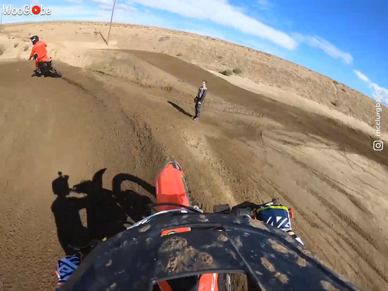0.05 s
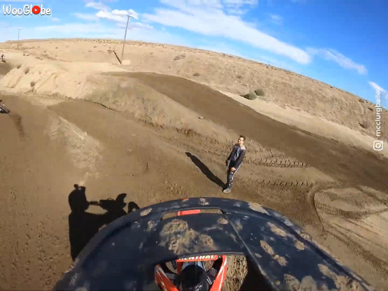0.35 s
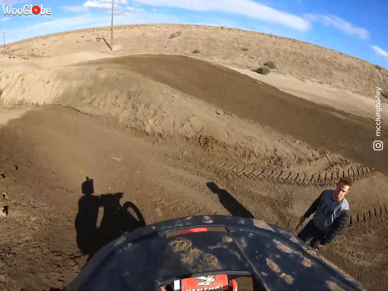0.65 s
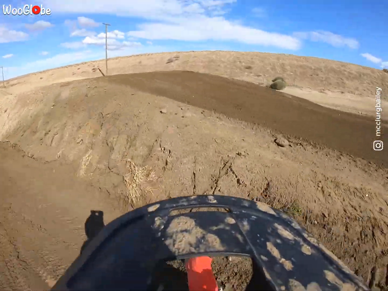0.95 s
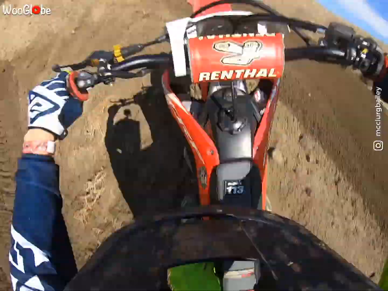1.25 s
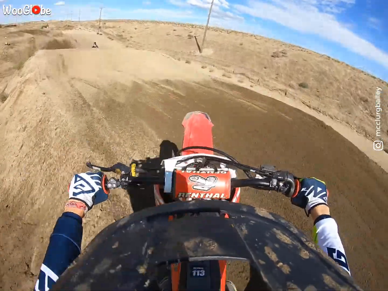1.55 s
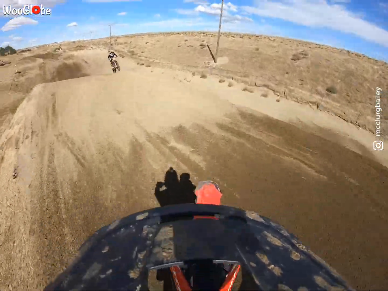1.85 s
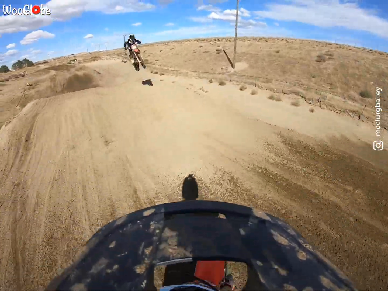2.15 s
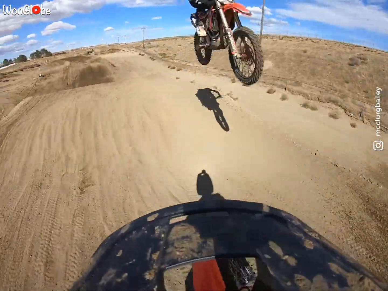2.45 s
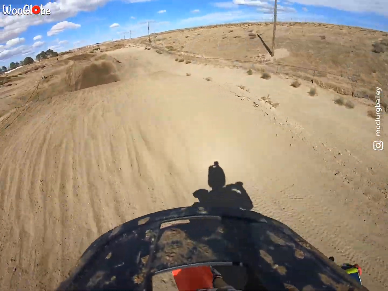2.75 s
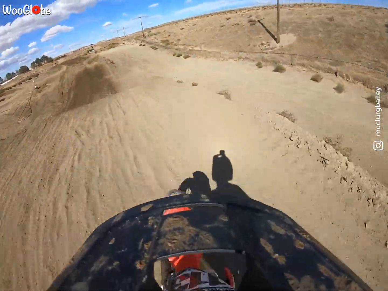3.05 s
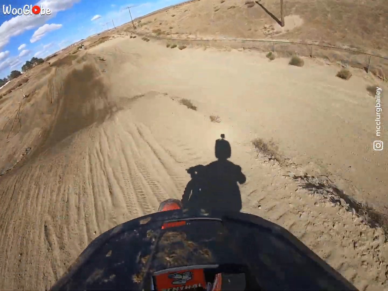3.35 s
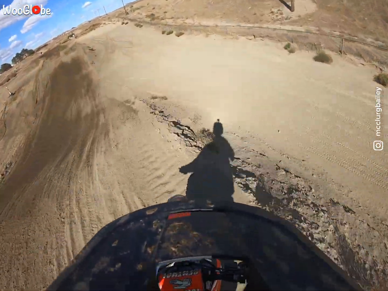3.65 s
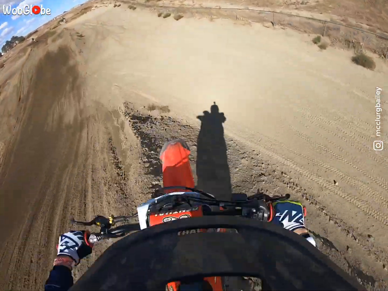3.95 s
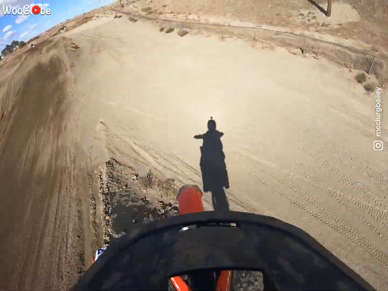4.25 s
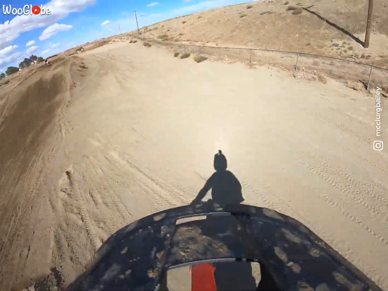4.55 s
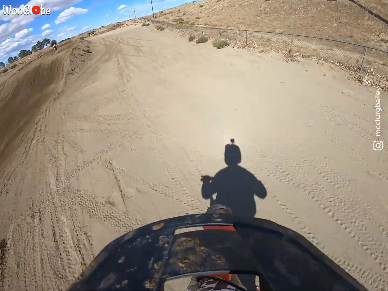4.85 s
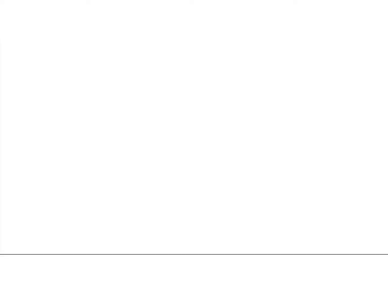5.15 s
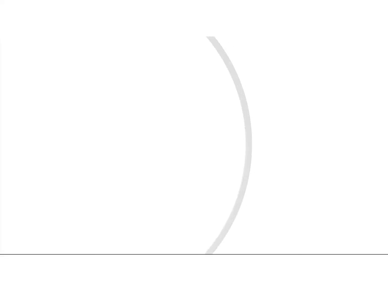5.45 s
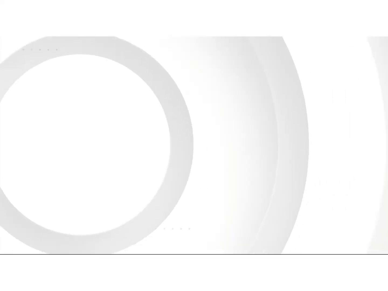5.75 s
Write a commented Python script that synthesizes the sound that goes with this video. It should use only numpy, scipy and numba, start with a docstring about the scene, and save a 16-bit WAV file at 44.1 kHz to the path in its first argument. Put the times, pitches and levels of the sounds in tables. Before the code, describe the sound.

A dirt bike booms and chugs in buffeting wind, heard from the rider's helmet, while another bike barks past.

```python
"""A four-stroke dirt bike booms under the throttle in buffeting wind, heard at the rider's helmet.
Its pulses resonate in the airbox, rasp in the pipe under load and chug with the throttle shut.
Another bike's exhaust barks past and falls away. Eddies off the helmet rumble and hiss,
the chassis knocks over bumps, and the sound stops abruptly."""
import sys
import numpy as np
from scipy import signal
from scipy.fft import rfft, irfft
from scipy.io import wavfile
from scipy.ndimage import uniform_filter1d
from numba import njit

SR = 44100
rng = np.random.default_rng(int(sys.argv[2]) if len(sys.argv) > 2 else 0)


def wav_record(signal):
    """Record a signal, one row per channel, as 16-bit PCM in the file named by sys.argv[1]."""
    frames = np.transpose(np.atleast_2d(signal))
    bounded = np.clip(frames, -1, 1)
    # unit amplitude maps onto the largest positive 16-bit level
    quanta = np.round(bounded * 32767).astype(np.int16)
    wavfile.write(sys.argv[1], SR, quanta)


N = 255095
T = np.arange(N) / SR


def undb(db):
    """Decibels to gain."""
    return 10 ** (np.asarray(db) / 20)


def curves(table):
    """Each column after the first, interpolated linearly in time."""
    time_s, *columns = np.transpose(table)
    return [np.interp(T, time_s, column) for column in columns]


def unit(x):
    """Scale to rms 1."""
    return x / np.sqrt(np.mean(x ** 2))


def steady(x, span_s=0.04):
    """Hold the short-term rms at 1, leaving single pulses intact."""
    size = int(span_s * SR)
    power = uniform_filter1d(uniform_filter1d(x ** 2, size), size)
    return x / np.sqrt(np.abs(power) + 1e-12)


def colour(x, spectrum):
    """Filter by (freq_hz, gain_db) points; rms 1."""
    hz, db = np.transpose(spectrum)
    bins_hz = np.maximum(np.fft.rfftfreq(N, 1 / SR), 1)
    gain = undb(np.interp(np.log(bins_hz), np.log(hz), db))
    return unit(irfft(rfft(x) * gain, N))


def noise():
    """White noise."""
    return rng.standard_normal(N)


def wander(rate_hz):
    """Straight glides between random values; rms 1."""
    step = int(SR / rate_hz)
    held = np.repeat(noise()[:N // step + 1], step)
    return unit(uniform_filter1d(held, step)[:N])


@njit
def bandpass(x, hz, width_hz):
    """State-variable band-pass with a moving centre."""
    out, band_state, low_state = np.empty(len(x)), 0., 0.
    for i in range(len(x)):
        g = np.tan(np.pi * hz[i] / SR)
        damping = width_hz[i] / hz[i]
        band = (band_state + g * (x[i] + 1e-18 - low_state)) / (1 + g * (g + damping))
        band_state = 2 * band - band_state
        low_state += 2 * g * band
        out[i] = damping * band
    return out


def ring(x, hz, width_hz, stages=1):
    """Identical resonances in series."""
    for _ in range(stages):
        x = bandpass(x, hz * np.ones(N), width_hz * np.ones(N))
    return x


def lowpass(x, hz, order):
    """Butterworth low-pass."""
    return signal.sosfilt(signal.butter(order, hz, fs=SR, output="sos"), x)


def firings(cycles, scatter_db):
    """One pulse of random strength per whole cycle."""
    count = np.floor(cycles)
    return np.diff(count, prepend=count[0]) * undb(scatter_db * noise())


def puffs(pulses, decay_s):
    """Turbulent gas: decaying noise after each pulse."""
    tails = signal.lfilter([1], [1, -np.exp(-1 / (decay_s * SR))], pulses + 1e-18)
    return tails * noise()


def swell(start_s, end_s, attack_s, release_s):
    """Rise towards 1, hold, die away."""
    rise = 1 - np.exp(-np.maximum(T - start_s, 0) / attack_s)
    return rise * np.exp(-np.maximum(T - end_s, 0) / release_s)


# peak_s, rise_s, fall_s, rumble_db, rush_db, hiss_db
NOISE_SWELLS = [(0.02, 0.085, 1, -21.5, -29, -39), (.32, 0.063, 0.12, -27, -21, -32.5),
                (.41, 0.12, 0.15, -34.5, -20, -31.5), (.66, 0.23, 0.7, -35.5, -26.5, -36.5),
                (1.111, 0.13, 0.15, -20.5, -22.5, -49), (1.21, 0.051, 0.1, -30, -19.5, -37),
                (1.34, 0.12, 0.17, -39, -31.5, -36), (1.851, 0.27, 0.28, -34.5, -35, -42),
                (2.061, 0.072, 0.048, -20.5, -23, -40.5), (2.256, 0.065, 0.075, -21.5, -27.5, -44),
                (2.35, 0.043, 0.13, -19, -43, -40.5), (2.57, 0.11, 0.16, -21, -22.5, -30),
                (2.69, .05, 0.066, -19, -26.5, -30.5), (3.078, 0.057, 0.08, -25, -25, -57),
                (3.341, 0.056, 0.098, -20, -24, -64), (3.46, 0.04, 0.063, -28, -26.5, -38.5),
                (3.615, 0.08, 0.13, -25, -20.5, -32.5), (3.75, 0.05, .05, -20.5, -25, -34),
                (3.89, 0.077, 0.1, -24.5, -22, -32.5), (4.101, 0.076, 0.2, -28.5, -31, -41),
                (4.281, 0.095, 0.033, -27, -29, -37.5), (4.48, 0.081, 0.15, -26, -24, -30.5),
                (4.591, 0.11, 0.2, -27, -23.5, -35), (4.68, 0.021, 0.069, -21.5, -39, -35.5),
                (4.83, 0.077, 0.058, -20.5, -27, -51), (4.951, 0.14, 0.19, -22, -21, -35.5),
                (5.16, 0.044, 0.076, -22, -24.5, -33)]


def noise_swells(calm_db):
    """Swells of rumble, rush and hiss: wind gusts, the other bike rushing past, an engine blip."""
    power = undb(calm_db)[:, None] ** 2
    for peak_s, rise_s, fall_s, *peaks_db in NOISE_SWELLS:
        distance = np.maximum((peak_s - T) / rise_s, (T - peak_s) / fall_s)
        crest = np.exp(-distance ** 1.1)  # exponent 1 is pointed, 2 a bell
        power = power + np.outer(undb(peaks_db), crest) ** 2
    return np.sqrt(power)


# Air spectra, low to high: freq_hz, gain_db
RUMBLE_SPECTRUM = [(15, -23), (35, -6.5), (62, 0), (80, -2.5), (115, -.5), (150, -3.5), (200, -11),
                   (300, -16), (900, -38), (4000, -110)]
RUSH_SPECTRUM = [(120, 1), (250, 6.5), (450, -1), (800, -6), (1300, -9.5), (1800, -18), (2600, -26.5),
                 (4500, -45.5), (6000, -73)]
HISS_SPECTRUM = [(800, 0), (1600, 9.5), (2400, 5.5), (3300, 2.5), (4400, -3.5), (4900, -12), (5500, -27.5),
                 (7000, -51)]
SIZZLE_SPECTRUM = [(4000, -12), (5700, -8.5), (7000, -5), (8300, -8.5), (10000, -17.5), (11500, -27),
                   (14000, -58.5)]
# Top treble relative to the hiss: time_s, gain_db
SIZZLE_GAIN = [(0, -22.5), (.4, -27.5), (.8, -22.5), (2.7, -24.5), (3.2, -23.5), (3.6, -34.5), (4.15, -29),
               (4.5, -36), (5.18, -30)]


def rushing_air():
    """Mostly eddies shed by the helmet: a low rumble, and upper bands that flutter together."""
    rumble_gain, rush_gain, hiss_gain = noise_swells(calm_db=(-29.5, -30.5, -49.5))
    sizzle_db, = curves(SIZZLE_GAIN)
    eddies = unit(undb(1.77 * np.tanh(wander(70)) + 1.1 * wander(420)))
    rumble = rumble_gain * colour(noise(), RUMBLE_SPECTRUM)
    rush = rush_gain * colour(eddies * noise(), RUSH_SPECTRUM)
    hiss = hiss_gain * colour(eddies * noise(), HISS_SPECTRUM)
    sizzle = hiss_gain * undb(sizzle_db) * colour(eddies * noise(), SIZZLE_SPECTRUM)
    return rumble + rush + hiss + sizzle


# start_s, level_db, centre_hz, decay_s
KNOCKS_AND_TICKS = [(0.935, -33, 1040, 0.022), (1.293, -35.5, 7500, 0.0013), (1.367, -43, 7565, 0.0046),
                    (1.368, -28, 3080, 0.0039), (3.535, -21, 950, 0.012), (3.536, -14.5, 230, .02),
                    (3.957, -22, 330, .02), (4.126, -30, 430, .008), (4.411, -14.5, 180, .014),
                    (4.771, -21.5, 520, .009), (4.801, -53, 6500, 0.0018), (4.823, -45, 6900, 0.0013),
                    (4.843, -53, 6200, 0.0017), (4.863, -49, 5700, 0.0022), (4.879, -50, 6240, .0015)]


def knocks_and_ticks():
    """Damped noise bursts: knocks over bumps, and a short run of faint exhaust ticks from another bike."""
    out = np.zeros(N)
    for start_s, level_db, centre_hz, decay_s in KNOCKS_AND_TICKS:
        envelope = (T >= start_s) * np.exp(-np.maximum(T - start_s, 0) / decay_s)
        width_hz = 0.39 * centre_hz
        makeup = np.sqrt(2 * SR / (np.pi * width_hz))  # offsets the band-pass loss
        out += undb(level_db) * makeup * ring(envelope * noise(), centre_hz, width_hz, stages=2)
    return out


# Stretches of firing, each with its own rate and tone: start_s, end_s, start_rate_hz, end_rate_hz,
# thump_db, silencer_db, bark_db, bark_hz, crack_db, snap_db
OTHER_BIKE_STRETCHES = [(0.404, 0.477, 41.2, 36.9, -41.5, -54, -47.5, 1965, -49.5, -64),
                        (0.5085, 0.605, 41.2, 42, -27.5, -49.5, -39, 2160, -45.5, -60),
                        (.63, 0.721, 43.9, 44.6, -40, -58, -47.5, 2330, -50.5, -65),
                        (0.816, 1.072, 42.57, 47.8, -30, -63, -48, 2094, -56, -71),
                        (1.386, 1.502, 52.6, 48.54, -25, -68, -56, 2553, -51, -79),
                        (1.526, 1.604, 50.5, 53.33, -34, -40, -41, 2373, -49.5, -62),
                        (1.619, 1.668, 56.9, 54.2, -32, -46.5, -52, 2135, -58, -83),
                        (1.679, 1.768, 47.4, 61.26, -22.5, -38.5, -41, 1865, -51, -69),
                        (1.784, 1.843, 68.54, 69.4, -32, -36.5, -46.5, 1740, -57, -72),
                        (1.859, 1.91, 58.8, 60.7, -36, -36.5, -51, 1710, -69, -77.5),
                        (1.924, 1.998, 72.9, 76.2, -35, -48.5, -38, 1400, -57, -78),
                        (2.037, 2.073, 55.35, 55.2, -43, -45, -49, 1744, -59, -90),
                        (2.09, 2.124, 56.7, 54.4, -39, -39.5, -53, 1733, -61, -75),
                        (2.146, 2.188, 56.44, 56.1, -33, -52, -56, 1695, -62, -79),
                        (2.24, 2.279, 48.94, 58.6, -29, -47, -54, 1702, -54, -71),
                        (2.297, 2.346, 59.63, 59.05, -50, -38, -44, 1850, -55, -73),
                        (2.365, 2.421, 58.5, 55.6, -54, -36.5, -39, 2300, -39, -60),
                        (2.433, 2.494, 57.47, 56.6, -36, -41, -47, 1912, -46.5, -76),
                        (2.505, 2.615, 57.5, 69.25, -32.5, -36, -39, 1605, -44, -71),
                        (2.627, 2.713, 69.7, 72.5, -22.5, -47.5, -52, 1428, -46.5, -75),
                        (2.719, 2.842, 66.24, 69.04, -28, -66.5, -65, 1537, -52.5, -80),
                        (2.867, 2.985, 61.4, 64.15, -24, -43.5, -60.5, 3890, -55.5, -74),
                        (3.011, 3.157, 61.9, 59, -26.5, -46.5, -68.5, 3920, -61, -86.5)]
# Exhaust crack, with the camera's dip near 5.8 kHz: freq_hz, gain_db
CRACK_SPECTRUM = [(700, -8), (1500, -3), (2300, 0), (3200, -3), (4500, -4), (5100, -10), (5800, -30),
                  (7500, -26), (10000, -43), (14000, -78)]
# freq_hz, gain_db
SNAP_SPECTRUM = [(3000, -23), (5400, 5.5), (7500, 4), (9000, -3), (11000, -12.5), (14000, -45.5)]


def other_bike():
    """Each firing thumps, rings the silencer and lets out a crack of gas with a snap on top."""
    pulses = np.zeros(N)
    midpoints = []
    for start_s, end_s, start_rate_hz, end_rate_hz, *timbre in OTHER_BIKE_STRETCHES:
        rate_hz = np.interp(T, [start_s, end_s], [start_rate_hz, end_rate_hz])
        cycles = (T - start_s) * (start_rate_hz + rate_hz) / 2
        active = (T > start_s - .005) * (T < end_s + .005)
        pulses += active * firings(cycles, scatter_db=1.4)
        midpoints.append(((start_s + end_s) / 2, *timbre))
    thump_db, silencer_db, bark_db, bark_hz, crack_db, snap_db = curves(midpoints)
    thump = ring(ring(pulses, 310, width_hz=48), 200, width_hz=50)
    thump += 0.07 * ring(ring(pulses, 90, width_hz=24), 60, width_hz=140)
    blast = pulses + .1 * puffs(pulses, decay_s=.004)
    blast = lowpass(blast, hz=4200, order=6)  # silencer packing absorbs the top
    silencer_hz = 1575 * (1 + .03 * wander(60))
    silencer = ring(blast, silencer_hz, width_hz=420, stages=2)
    bark = ring(blast, bark_hz, width_hz=.22 * bark_hz, stages=2)
    crack = colour(pulses + .5 * puffs(pulses, decay_s=.002), CRACK_SPECTRUM)
    snap = colour(puffs(pulses, decay_s=.0009), SNAP_SPECTRUM)
    return (undb(thump_db) * unit(thump) + undb(silencer_db) * unit(silencer)
            + undb(bark_db) * unit(bark) + undb(crack_db) * crack + undb(snap_db) * snap)


def helmet(x):
    """The helmet passes mostly the low boom."""
    return lowpass(x, hz=470, order=8)


# freq_hz, gain_db
RASP_SPECTRUM = [(300, -29.5), (480, -6.5), (750, -1.5), (1300, -4), (1700, -16.5), (3000, -23),
                 (5000, -46), (8000, -77.5)]


def pipe_rasp(exhaust):
    """Each exhaust pulse rattles down the pipe as a short noise tail."""
    pipe_response = noise() * np.exp(-T / .007)
    rattle = signal.fftconvolve(exhaust, pipe_response)[:N]
    return steady(colour(rattle, RASP_SPECTRUM))


def tailpipe_thud(exhaust, firing_hz):
    """The tailpipe thuds harder when the firing rate meets its resonance."""
    pipe_hz, spread_hz = 60.5, 5.1
    level_db = -40.5 + 11.5 * np.exp(-((firing_hz - pipe_hz) / spread_hz) ** 2)
    thud = ring(ring(exhaust, 62, width_hz=45), 66, width_hz=60)
    return undb(level_db) * steady(thud)


# start_s, end_s, then level_db of each harmonic ahead of the helmet
DRONES = [(-.05, .12, -28.5, -29.5, -47.5, -51.5), (0.547, 0.652, -27, -34.5, -27, -22.5),
          (0.664, 0.762, -22, -20, -20, -44), (0.772, 0.87, -22, -32.5, -25.5, -42),
          (0.908, 0.98, -25, -40, -27.5, -40.5), (1.205, 1.312, -28.5, -33, -33, -52.5),
          (2.634, 2.786, -26, -18, -25, -40.5), (2.77, 2.922, -28.5, -16, -41.5, -37.5),
          (2.9, 3.063, -28, -21, -38, -41)]


def airbox_drone(cycles):
    """Under load the airbox drones on even harmonics of the firing rate."""
    pull = np.array([swell(start_s, end_s, attack_s=0.016, release_s=0.019)
                     for start_s, end_s, *_ in DRONES])
    gains = undb(np.array(DRONES)[:, 2:]).T @ pull
    tones = np.cos(2 * np.pi * np.outer((4, 6, 8, 10), cycles))
    return np.sqrt(2) * np.sum(gains * tones, axis=0)


def airbox_honk(pulses, firing_hz, opening):
    """A higher resonance that climbs with the revs and grows as the throttle opens."""
    centre_hz = np.maximum(278, 4.8 * firing_hz)
    return (0.2 + opening) * steady(ring(pulses, centre_hz, width_hz=68))


# Boom before throttle gain: time_s, level_db
COASTING_BOOM = [(0, -21.5), (.25, -19.5), (.35, -21.5), (.55, -22.5), (.8, -22), (1.15, -28.5),
                 (1.38, -32), (1.55, -24.5), (1.75, -17), (2.05, -25.5), (2.2, -25.5), (2.44, -37),
                 (2.52, -21), (2.62, -32.5), (2.71, -29.5), (3.18, -22), (3.28, -31.5), (3.42, -27),
                 (3.55, -19), (4.1, -20), (4.45, -21), (4.73, -25), (4.85, -28.5), (5.17, -25.5)]


def airbox_boom(pulses, cycles, firing_hz, opening, lift_hz):
    """Pulses boom in the airbox, rising with the revs; off the throttle each is a separate chug."""
    level_db, = curves(COASTING_BOOM)
    shut = 1 - opening
    waver_db = 1.2 * shut * wander(14)
    centre_hz = np.maximum(165.7, 4.3 * firing_hz) + lift_hz
    boom = ring(ring(pulses, centre_hz, width_hz=54), 178, width_hz=120)
    chug_depth, lag_cycles = .45, .33
    chug = 1 - chug_depth * shut * np.cos(2 * np.pi * (cycles - lag_cycles))
    return undb(level_db + waver_db) * steady(boom * chug)


# start_s, end_s, opening (0-1), boom_gain_db, boom_lift_hz, honk_gain_db, extra_scatter_db, rasp_db
THROTTLE_TWISTS = [(-.05, 0.072, 0.8, 2, 18, -7, 7, -56), (0.492, 0.767, 1, 4, 36.5, -15, -1.5, -31.5),
                   (0.712, 1.021, 0.66, 4, 6, 0, 4, -36.5), (1.185, 1.278, 0.72, 5.5, 9.5, 8, -1, -41),
                   (1.394, 1.599, 0, 7, 29, 2, 9, -40), (2.624, 2.809, 0.37, 7, 54, -2, -9.5, -51),
                   (2.787, 2.998, 0.5, 5.5, 36, -3, 3.5, -40.5),
                   (2.972, 3.224, 0.33, 4.5, 27.5, -3, 2.5, -55.5),
                   (3.493, 4.189, 0.03, -1.5, 24.5, 3, -1.5, -40), (4.482, 4.631, 0.3, 5.5, 5, 5, -1, -39),
                   (4.689, 4.744, 0.2, 14.5, -6, -9, -0.5, -48.5),
                   (4.987, 5.101, 0.3, 7.5, 17.5, -12.5, -7.3, -34)]


def throttle():
    """Twists of the grip as smooth control curves, the rasp as a linear gain."""
    grip = np.array([swell(start_s, end_s, attack_s=0.037, release_s=0.021)
                     for start_s, end_s, *_ in THROTTLE_TWISTS])
    grip /= np.maximum(grip.sum(axis=0), 1)  # overlapping twists blend
    _, _, *controls, rasp_db = np.transpose(THROTTLE_TWISTS)
    return np.array([*controls, undb(rasp_db)]) @ grip


# time_s, firing_hz
REVS = [(0, 59.96), (.06, 64.5), (.2, 55.5), (.29, 57.27), (.37, 49.87), (.49, 40.37), (.55, 27.9),
        (.6, 31.15), (.7, 40.12), (.75, 45.06), (.81, 50.7), (.87, 53.38), (.95, 50.07), (1.08, 48.1),
        (1.19, 57.93), (1.33, 67.02), (1.39, 44.6), (1.49, 46.34), (1.59, 52.28), (2.0, 37.3),
        (2.25, 36.76), (2.5, 43.22), (2.68, 44.91), (2.76, 46.38), (2.9, 53.3), (2.99, 49.7), (3.07, 51.32),
        (3.15, 46.08), (3.52, 35.89), (3.62, 43), (3.77, 45.97), (4.2, 43.93), (4.26, 36.81), (4.4, 35.48),
        (4.52, 41.27), (4.65, 48.92), (4.76, 47.03), (4.88, 41.92), (5.19, 40.57)]


def engine():
    """The rider's four-stroke: exhaust pulses drive the pipe and, with intake gulps, the airbox."""
    firing_hz, = curves(REVS)
    coasting_db, = curves(COASTING_BOOM)
    opening, boom_gain_db, lift_hz, honk_gain_db, extra_scatter_db, rasp_gain = throttle()
    waver_db = 1.2 * (1 - opening) * wander(14)
    cycles = np.cumsum(firing_hz) / SR + .005 * wander(30)
    scatter_db = 1.6 + extra_scatter_db
    exhaust = firings(cycles + .5, scatter_db)
    intake = opening * firings(cycles, scatter_db)
    muffled = helmet(exhaust + intake)
    boom = airbox_boom(muffled, cycles, firing_hz, opening, lift_hz)
    honk = undb(honk_gain_db - 4.5) * airbox_honk(muffled, firing_hz, opening)
    airbox = undb(boom_gain_db) * (boom + undb(coasting_db + waver_db) * honk)
    pipe = rasp_gain * pipe_rasp(exhaust) + tailpipe_thud(exhaust, firing_hz)
    return airbox + pipe + helmet(airbox_drone(cycles))


def scene():
    """Both bikes, air and knocks at the helmet, in mono."""
    return (engine() + other_bike() + rushing_air() + knocks_and_ticks())[None]


def record(dry):
    """The helmet camera rounds the loudest peaks, stops and cuts the top treble."""
    ceiling, stop_s, cutoff_hz = .55, 5.186, 13500
    rounded = dry / (1 + (dry / ceiling) ** 4) ** (1 / 4)
    running = np.clip((stop_s - T) / .003, 0, 1)
    top_cut = signal.ellip(8, .2, 70, cutoff_hz, fs=SR, output="sos")
    return signal.sosfilt(top_cut, rounded * running)


dry = scene()
out = record(dry)
wav_record(out)
```